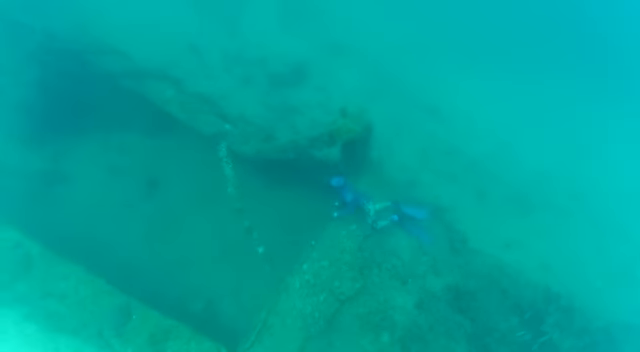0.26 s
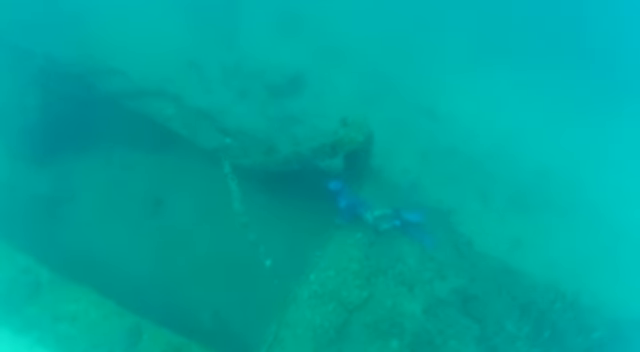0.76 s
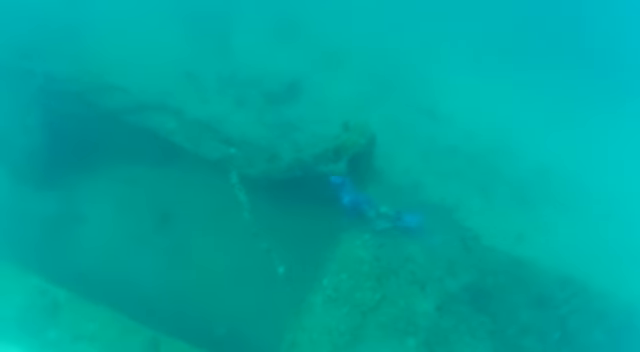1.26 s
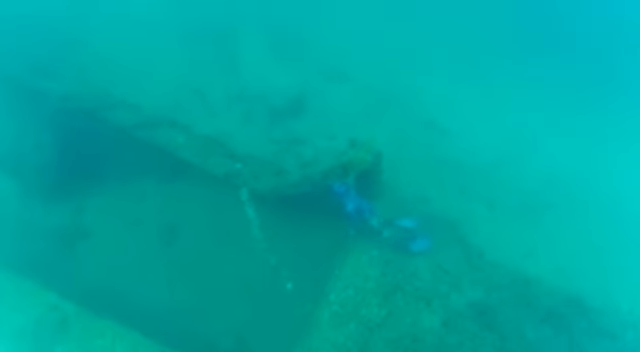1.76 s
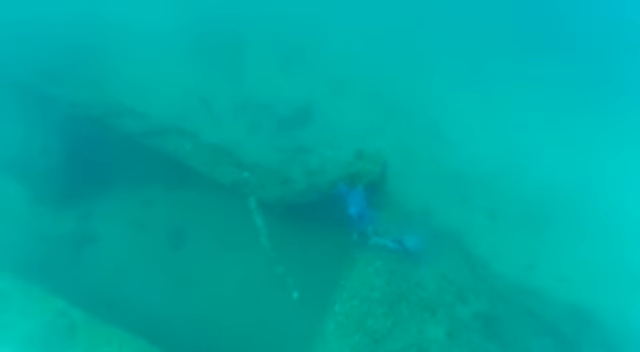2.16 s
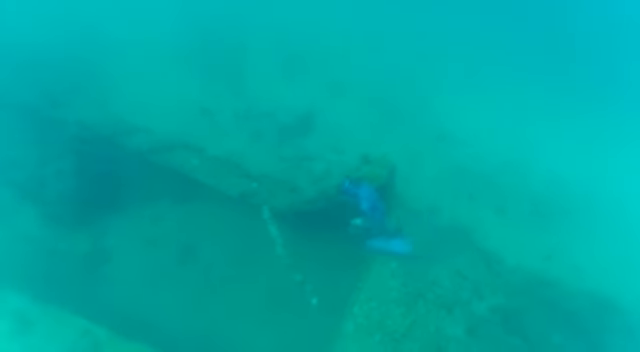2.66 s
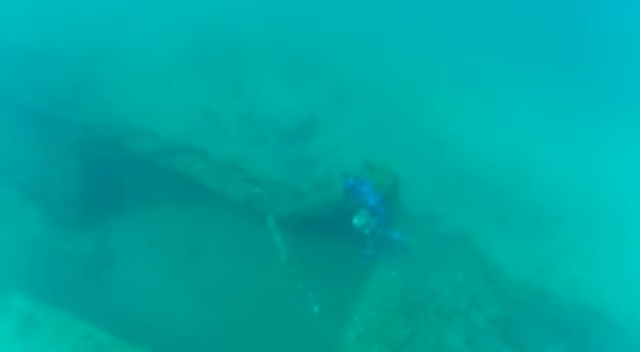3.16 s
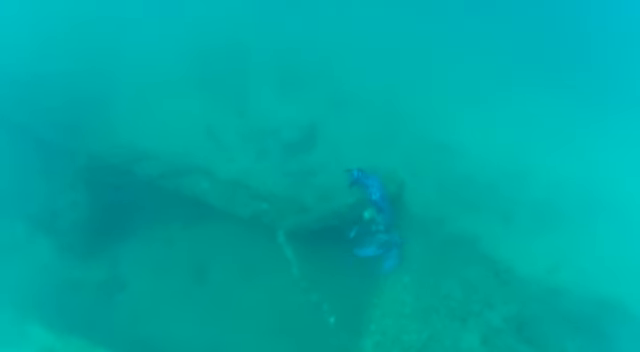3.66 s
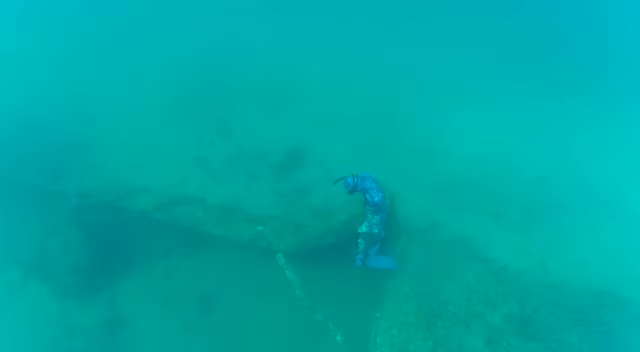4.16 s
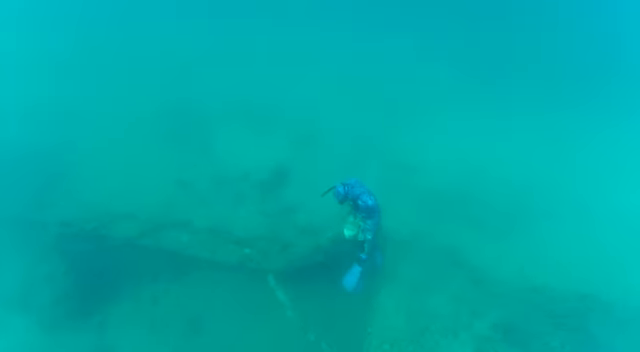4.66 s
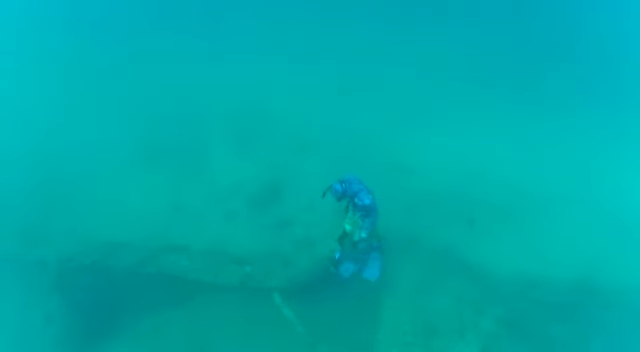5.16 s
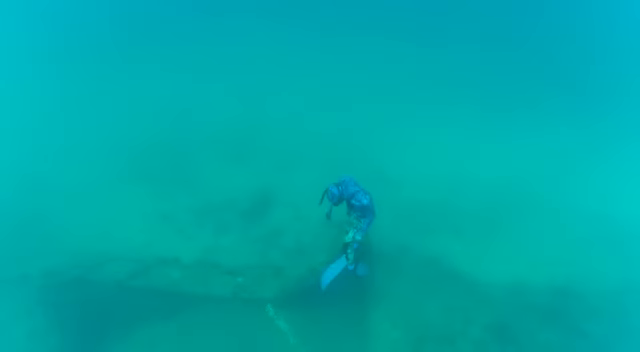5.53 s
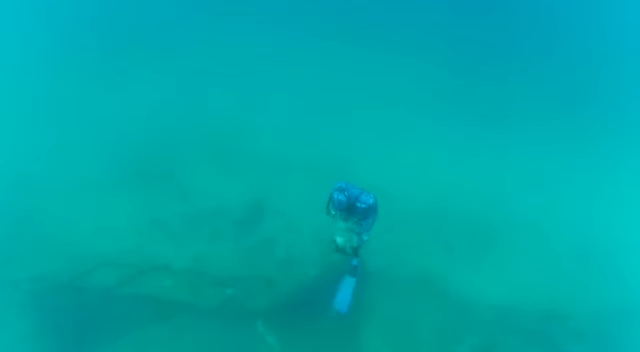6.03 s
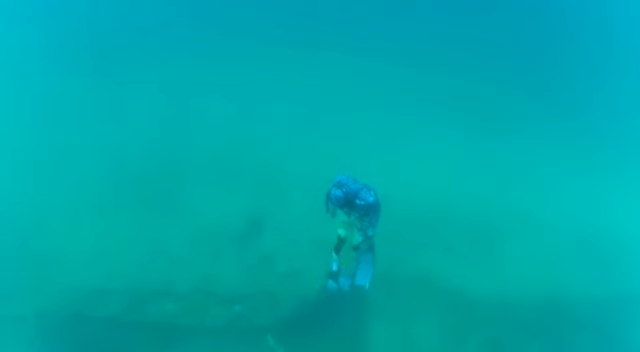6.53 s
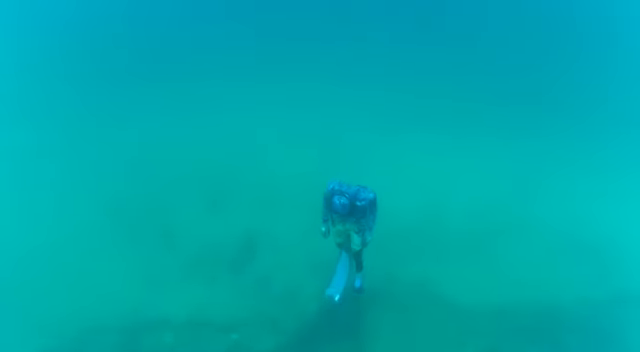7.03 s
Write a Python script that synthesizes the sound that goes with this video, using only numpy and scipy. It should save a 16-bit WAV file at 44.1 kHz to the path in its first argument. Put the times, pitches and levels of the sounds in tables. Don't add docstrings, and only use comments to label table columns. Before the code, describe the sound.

Underwater, a steady fine fizz of distant shrimp is peppered with sharp irregular clicks, low fish knocks and faint grunts over dull water rumble.

```python
import sys
import numpy as np
from scipy import signal
from scipy.fft import rfft, irfft
from scipy.io import wavfile
from scipy.ndimage import uniform_filter1d

SR = 44100
rng = np.random.default_rng(int(sys.argv[2]) if len(sys.argv) > 2 else 0)


def invert_db(level):
    return 10 ** (np.asarray(level, dtype=float) / 20)


def store_wav(level_fs):
    pcm = np.round(np.clip(np.atleast_2d(level_fs), -1, 1) * 32767)
    wavfile.write(sys.argv[1], SR, pcm.T.astype(np.int16))


N = 321489


def evened(x):
    return x / np.sqrt(np.mean(x ** 2) + 1e-20)


def read(points, hz):
    f, value = np.transpose(points)
    return np.interp(np.log(hz + 1), np.log(f + 1), value)


def curve(rows):
    return np.interp(np.arange(N) / SR, *np.transpose(rows))


def add(mix, s, sound):
    part = mix[round(s * SR):][:len(sound)]
    part += sound[:len(part)]


def band(x, lo, hi):
    return signal.sosfilt(signal.butter(3, [lo, hi], "band", fs=SR, output="sos"), x)


def housing(x):
    # (frequency [Hz], width [Hz], level [dB])
    panels = [(1004, 124, -2.5), (1636, 36, -8), (2106, 185, 0), (2287, 140, 2), (2577, 115, -3),
              (3610, 430, -6.5), (4147, 185, -7), (4570, 213, -8.5), (5160, 460, -7), (6010, 173, -12),
              (6946, 680, -6), (8000, 310, -12.5), (9440, 600, -16), (10280, 1000, -19),
              (15400, 4400, -22.5)]
    hz = abs(np.fft.fftfreq(8192, 1 / SR))
    power = sum(invert_db(db) ** 2 / (1 + (2 * (hz - f) / width) ** 2) ** 1.29 for f, width, db in panels)
    leak_db = -32.0
    log_gain = np.log(power + invert_db(leak_db) ** 2) / 2
    response = np.fft.ifft(np.exp(np.conj(signal.hilbert(log_gain)))).real[:2048]
    if x.ndim > 1:
        return signal.lfilter(response, 1, x)
    return signal.oaconvolve(x, response)[:len(x)]


def arrival(t, rise, t60, tail_db, tail_t60):
    fall = invert_db(-60 * np.maximum(t - rise, 0) / t60)
    tail = invert_db(tail_db - 60 * t / tail_t60)
    return np.minimum(t / rise, 1) ** 1.67 * (fall + tail)


def wash():
    # (frequency [Hz], level [dB per Hz])
    spectrum = [(7, -2), (14, -3.5), (26, -22), (44, -25), (85, -31), (116, -24.5), (155, -33.5),
                (230, -34.5), (300, -36), (500, -39), (600, -42.5), (900, -47.5), (1250, -57.5),
                (2000, -62)]
    # (time [s], level [dB])
    surge_levels = [(0.0, -53.5), (0.63, -47), (0.71, -59.5), (1.18, -46), (2.35, -48.5), (2.52, -38.5),
                    (2.76, -56.5), (3.0, -45), (4.06, -50.5), (4.1, -46), (4.89, -44.5), (4.95, -38),
                    (5.4, -53), (5.76, -44.5), (7.21, -47.5), (7.29, -52)]
    # (frequency [Hz], side minus mid [dB])
    apart = [(20, -23), (60, -11), (125, -30), (250, -30), (600, -28), (2000, -30)]
    wash_db, pan_db = -47, -.6
    hz = np.fft.rfftfreq(N, 1 / SR)
    noise = rfft(rng.standard_normal((2, N)))
    mid, side = noise * invert_db(read(spectrum, hz) - 60 * (hz < 2))
    swell = hz < 32
    surge = invert_db(curve(surge_levels)) * evened(irfft(mid * swell, N))
    scale = invert_db(wash_db) / np.std(irfft(mid, N))
    water = scale * irfft(mid * ~swell, N)
    side = scale * irfft(side * invert_db(read(apart, hz)) * (hz > 12), N)
    return surge * invert_db(pan_db * np.array([[.5], [-.5]])) + water + side * np.array([[1], [-1]])


def engine():
    # (frequency [Hz], level [dB rms])
    orders = [(58.6, -87), (117.2, -77), (175.8, -80), (234.4, -76.5), (293, -80), (351.6, -78.5)]
    noises = rng.standard_normal((len(orders) + 1, N))
    slow = [evened(uniform_filter1d(uniform_filter1d(v, 5000), 5000)) for v in noises]
    time = np.cumsum(1 + 0.0043 * slow[-1]) / SR
    out = np.zeros(N)
    for (hz, db), waver in zip(orders, slow):
        out += np.sqrt(2) * invert_db(db + 2.56 * waver) * np.sin(2 * np.pi * hz * time)
    return out


def far_crackle():
    # (low edge [Hz], high edge [Hz], rate [snaps/s], size spread [dB], blur [s], level [dB])
    crowds = [
        (670, 1790, 150, 1.5, 0.0062, -0.5),
        (1380, 3100, 260, 2.5, 0.0059, -0.5),
        (2560, 6000, 200, 3, 0.017, 1.5),
        (5050, 12000, 230, 2.5, 0.009, -2),
        (7940, 17000, 300, -5, 0.0042, 2),
        (1410, 15600, 250, 1.5, 0.0026, -2.5),
    ]
    crackle_db = -60
    out = invert_db(-3) * rng.standard_normal(N)
    for lo_hz, hi_hz, per_s, spread_db, blur, db in crowds:
        sizes = invert_db(2 * spread_db * np.minimum(rng.exponential(1, N), 4.0))
        power = sizes * (rng.random(N) < per_s / SR)
        puffs = np.sqrt(abs(signal.oaconvolve(power, np.hanning(round(blur * SR)) ** 2, "same")))
        slow = evened(uniform_filter1d(uniform_filter1d(rng.standard_normal(N), 3000), 3000))
        level_db = db + 1.9 * slow
        out += invert_db(level_db) * band(evened(puffs) * rng.standard_normal(N), lo_hz, hi_hz)
    return invert_db(crackle_db + 2.5) * evened(housing(out))


def small_snaps():
    u = rng.random((70, 3))
    peak_db = -41.5 + 3 * np.log(u[:, 1])
    tilt_db = -6.5 + 10.5 * 2 * (2 * u[:, 2] - 1)
    return np.c_[u[:, 0] * N / SR, peak_db, tilt_db]


def near_snaps():
    # (time [s], peak [dB], tilt [dB/band], rising = bright, middle band lift [dB])
    loud_snaps = [(0.0213, -37, -10, 4), (0.1526, -36, -8, 2), (0.302, -37.5, -3, 2),
                  (0.5818, -38.5, 14, -1.5), (0.8137, -36.5, 15, -8), (0.82, -36, 2.5, 0),
                  (0.8816, -35, -2.5, 1.5), (1.5492, -37, -10, 7), (1.723, -34, -4.5, 1),
                  (1.924, -29.5, -1, 11), (1.9312, -25.5, 0, 8), (2.3533, -37, 3, -1.5),
                  (2.9173, -28, -7.5, 4.5), (3.0804, -34.5, -1.5, 6), (3.3441, -33, 10, 9),
                  (3.4398, -38.5, -10, 6), (3.7184, -34, -5.5, 2.5), (4.3808, -36.5, 3, -13),
                  (4.4797, -37.5, 2, 2), (4.6428, -36.5, -14, 6), (4.7264, -33, -6.5, -6),
                  (4.7865, -38, -13, -2.5), (4.811, -32, 16, 5), (4.999, -35, 8, 11),
                  (5.1463, -31.5, -5, 3.5), (5.1971, -26.5, 0.5, 4.5), (5.2056, -36, -8, 4),
                  (5.9763, -31.5, -4, 2.5), (6.6214, -34.5, -8, 4.5), (7.204, -32, 1.5, 3)]
    # (time [s], peak [dB])
    dull_snaps = [(0.4614, -40), (0.7673, -42), (0.8606, -44), (1.2252, -39.5), (1.2695, -41.5),
                  (1.348, -38), (1.8183, -39.5), (2.0006, -37.5), (2.0205, -38.5), (2.0717, -39),
                  (2.3068, -41), (2.5301, -36.5), (2.6738, -42.5), (2.6958, -41.5), (3.4993, -37.5),
                  (3.6716, -39.5), (3.7928, -38), (3.9714, -39), (4.099, -36.5), (4.4179, -38.5),
                  (4.56, -37.5), (4.6297, -42), (5.4779, -40.5), (5.546, -41), (5.7296, -41), (5.9199, -40),
                  (6.1613, -43.5), (6.4326, -35), (6.7066, -39), (6.751, -35.5)]
    # (low edge [Hz], high edge [Hz])
    snap_bands = [(1350, 3000), (3000, 6000), (6000, 10000), (10000, 17000), (700, 1350)]
    dull_tilt_db, middle_db = -9.5, 4
    top_db, top_spread_db = -7.5, 6.5
    thud_db = -16
    out, t = np.zeros(N), np.arange(3000) / SR
    rows = loud_snaps + [(s, db, dull_tilt_db, middle_db) for s, db in dull_snaps]
    rows = rows + [(*row, middle_db) for row in small_snaps()]
    envelope = arrival(t, rise=.0006, t60=.008, tail_db=-23, tail_t60=.08)
    rings = housing(rng.standard_normal((len(rows), len(t))) * envelope)
    tops_db = top_db + top_spread_db * rng.standard_normal(len(rows))
    bands = np.array([band(rings, lo, hi) for lo, hi in snap_bands])
    bands = bands / abs(bands).max(2, keepdims=True)
    for k, (s, peak_db, tilt_db, lift_db) in enumerate(rows):
        levels_db = np.array([-tilt_db, lift_db, tilt_db, tilt_db + tops_db[k], thud_db - tilt_db])
        snap = invert_db(levels_db) @ bands[:, k]
        add(out, abs(s - .0003), invert_db(peak_db - 0.63) * snap / abs(snap).max())
    return out


def fish():
    # (time [s], peak [dB], bladder pitch [Hz], overtone [dB])
    knocks = [(0.323, -35, 617, -13), (0.499, -37, 776, -20), (0.719, -35, 640, -13.5),
              (0.474, -47, 597, -25), (0.862, -45.5, 575, -13), (1.345, -34.5, 670, -13.5),
              (1.433, -36, 670, -10.5), (1.502, -49, 570, -7), (1.564, -47, 585, -6.5),
              (1.595, -35.5, 660, -10.5), (2.149, -48, 550, -5), (2.863, -35, 734, -21),
              (3.157, -41.5, 890, -24), (3.183, -44.5, 910, -16), (3.323, -43.5, 579, -10),
              (3.954, -44, 610, -9), (4.056, -33.5, 726, -14.5), (5.255, -32, 735, -31),
              (5.329, -36, 820, -26), (6.352, -45.5, 850, -25), (6.432, -30, 780, -22),
              (6.756, -29, 820, -43)]
    # (time [s], peak [dB], pitch
    # [Hz])
    rolls = [(1.791, -47, 600), (1.8, -46, 955), (1.82, -46, 980), (1.827, -55, 990), (1.842, -46.5, 520),
             (1.85, -58, 950), (1.888, -50, 560), (1.896, -67, 947), (5.37, -41, 955), (5.374, -33.5, 824),
             (5.384, -38.5, 623), (5.4, -38, 810), (5.411, -47, 905), (5.417, -48, 915), (5.427, -55, 920),
             (5.433, -48, 760)]
    # (time [s], peak [dB], pitch [Hz])
    pops = [
        (0.038, -55, 930),
        (2.17, -56, 1030),
        (2.219, -54, 1040),
        (2.662, -50, 1670),
        (2.917, -45, 1650),
        (3.498, -53, 1090),
        (3.718, -47.5, 1410),
        (5.147, -48, 1030),
        (5.228, -52, 1050),
        (5.616, -50, 1670),
    ]
    # (delay [s], level [dB])
    knock_echoes = [(.0045, -9.5), (.012, -8), (.017, -51)]
    roll_edge_db = -55
    pop_edge_db = -14.5
    out, t = np.zeros(N), np.arange(3000) / SR
    beats = knocks + [(s, db, hz, roll_edge_db - db) for s, db, hz in rolls]
    beats = beats + [(*row, pop_edge_db) for row in pops]
    envelope = arrival(t, rise=0.0053, t60=0.04, tail_db=-9.5, tail_t60=0.23)
    scatter = rng.standard_normal((len(beats), len(t))) * envelope
    for (s, peak_db, hz, edge_db), noise in zip(beats, scatter):
        cycles = hz * t
        shape = cycles ** 2.5 * np.exp(-2.1 * cycles)
        pulse = shape / shape.max() * np.cos(2 * np.pi * (cycles - 1.05))
        u = (cycles - 1.05) / hz / 0.00024
        edge = (1 - 2 * u ** 2) * np.exp(-u ** 2)
        ring = housing(edge)
        edge += .5 * ring / abs(ring).max()
        pulse += invert_db(edge_db + 11.5) * edge / abs(edge).max()
        tail = signal.oaconvolve(noise, np.diff(pulse[:400]))[:len(t)]
        add(out, s, invert_db(peak_db + .5) * (pulse + invert_db(-18) * tail / abs(tail).max()))
    echoes = np.zeros(N)
    for delay, db in knock_echoes:
        add(echoes, delay, -invert_db(db) * out)
    shallow = signal.butter(3, 480, "high", fs=SR, output="sos")
    return signal.sosfiltfilt(shallow, out) + band(echoes, 830, 6000)


def grunts():
    # (time [s], length [s], pitch [Hz], width [Hz], level [dB])
    calls = [
        (0.1, 0.18, 505, 119, -70),
        (1.029, 0.11, 539, 100, -76),
        (1.458, 0.17, 426, 100, -71),
        (1.994, 0.095, 553, 100, -75),
        (2.36, 0.17, 449, 90, -77),
        (4.47, 0.052, 582, 80, -69.5),
        (4.683, 0.28, 475, 110, -73.5),
        (5.79, 0.07, 488, 120, -75),
        (6.08, 0.35, 487, 80, -76),
        (6.851, 0.16, 476, 80, -74.5),
    ]
    out = np.zeros(N)
    noises = rng.standard_normal((len(calls), SR // 2))
    for (s, length, hz, width, db), noise in zip(calls, noises):
        t = np.arange(round(length * SR)) / SR
        throb = 0.12 + np.sin(np.pi * 28 * t) ** 4
        blur = evened(band(noise, hz - width / 2, hz + width / 2))[-len(t):]
        tone = 0.89 * np.sin(2 * np.pi * hz * t) + 0.6 * blur
        add(out, s, invert_db(db + 10.5) * tone * throb * signal.windows.tukey(len(t), .2))
    return out


def thin_snaps():
    # (time [s], peak [dB])
    bright_snaps = [(0.174, -40), (0.2812, -38), (0.5533, -40), (1.015, -39), (1.0244, -38), (1.236, -45),
                    (1.576, -41), (1.6099, -39), (1.8242, -36.5), (2.8904, -48), (2.4897, -41),
                    (2.8477, -38), (3.4755, -34), (3.8535, -40), (4.1789, -37), (4.1962, -39),
                    (4.4414, -36.5), (4.4877, -37), (4.8052, -37), (4.9297, -40), (5.0115, -36),
                    (5.2058, -26.5), (5.3926, -39), (5.8834, -41), (6.0828, -35), (6.57, -40),
                    (6.5994, -43), (6.8089, -42), (6.9378, -41), (7.0133, -50)]
    out, t = np.zeros(N), np.arange(600) / SR
    envelope = arrival(t, rise=.0005, t60=.005, tail_db=-26, tail_t60=.03)
    rings = housing(rng.standard_normal((len(bright_snaps), len(t))) * envelope)
    snaps = band(rings, 3400, 16100) + invert_db(-8) * band(rings, 9370, 18000)
    for (s, peak_db), snap in zip(bright_snaps, snaps):
        add(out, s, invert_db(peak_db - 0.5) * snap / abs(snap).max())
    return out


def bumps():
    # (time [s], peak [dB], time to peak [s])
    pushes = [
        (3.206, -35, .005),
        (4.22, -46, .004),
    ]
    out = np.zeros(N)
    for s, peak_db, rise in pushes:
        u = np.arange(SR // 20) / SR / rise
        add(out, s, -invert_db(peak_db) * (u * np.exp(1 - u)) ** 2)
    return out


def scene():
    shrimp = far_crackle() + near_snaps() + thin_snaps()
    return wash() + engine() + shrimp + fish() + grunts() + bumps()


def top_cut(x):
    return signal.sosfilt(signal.butter(12, 16480, fs=SR, output="sos"), x)


def record(dry):
    # (low edge [Hz], high edge [Hz], level [dB rms])
    self_noise = (7200, 20000, -71.5)
    # (frequency [Hz], level [dB])
    microphone = [(14800, 0), (15300, -2), (15450, -27), (16300, -31), (16600, -70)]
    lo_hz, hi_hz, db = self_noise
    hiss = invert_db(db) * evened(band(rng.standard_normal(N), lo_hz, hi_hz))
    edge = invert_db(read(microphone, np.fft.rfftfreq(N, 1 / SR)))
    mix = irfft(rfft(dry + hiss) * edge, N) - .0009
    return top_cut(mix)


dry = scene()
out = record(dry)
store_wav(out)
```